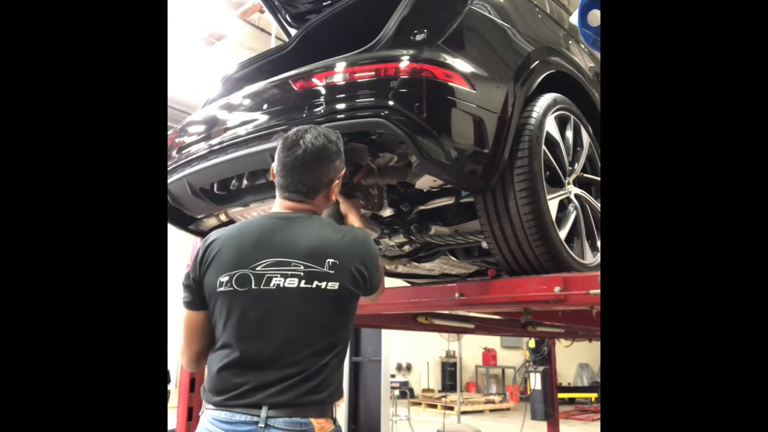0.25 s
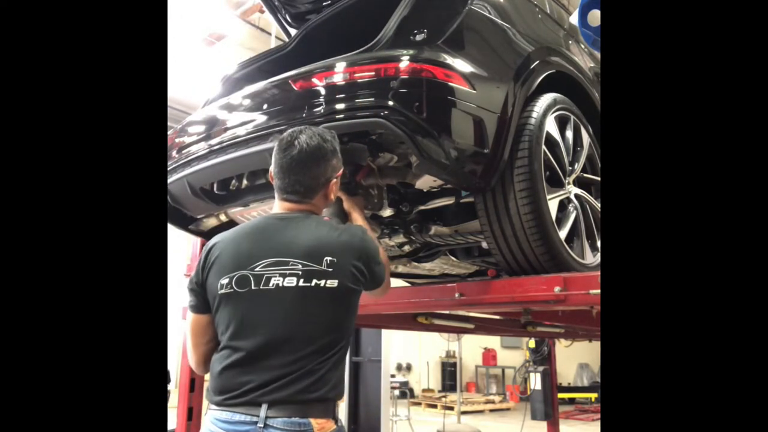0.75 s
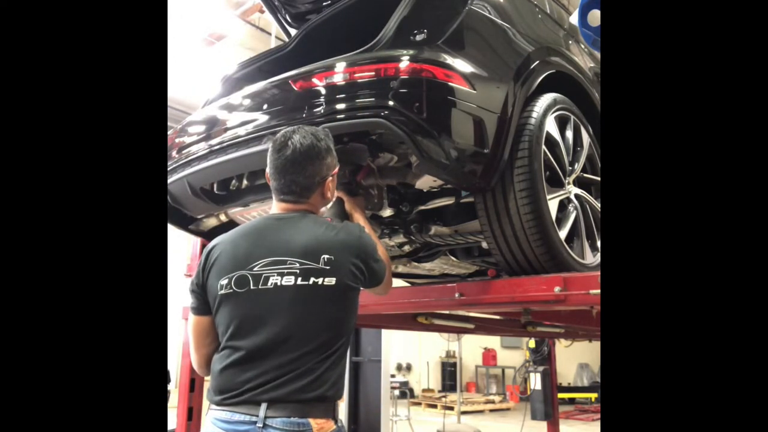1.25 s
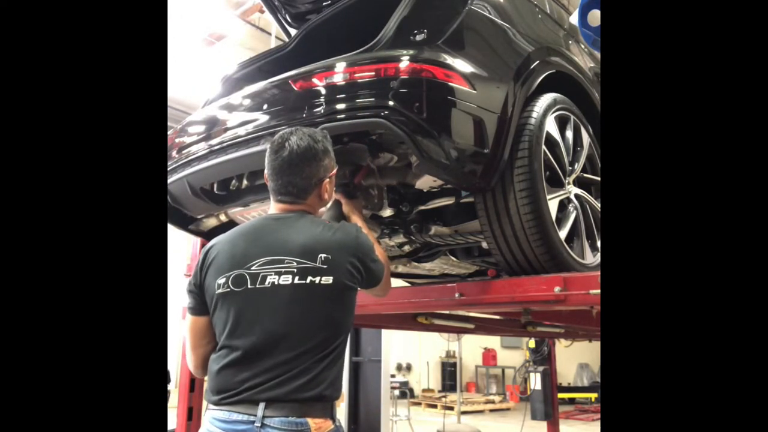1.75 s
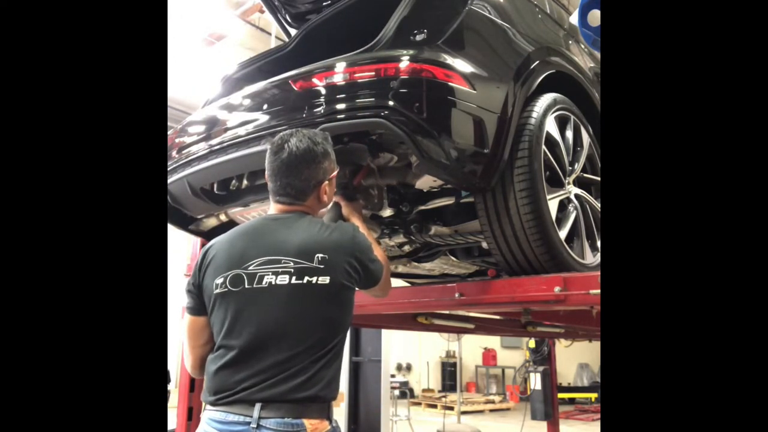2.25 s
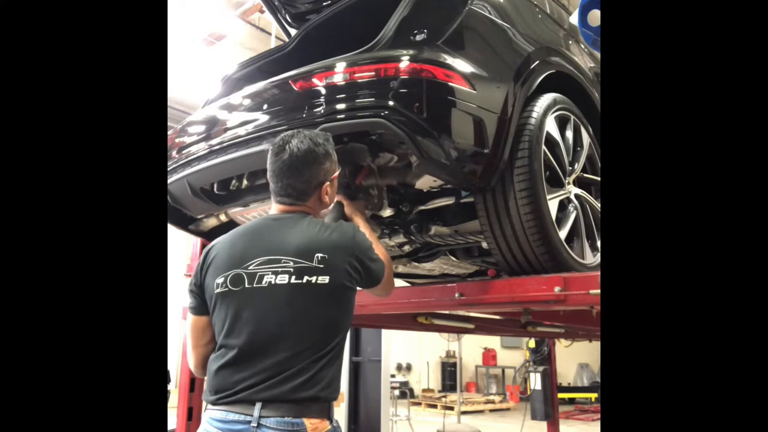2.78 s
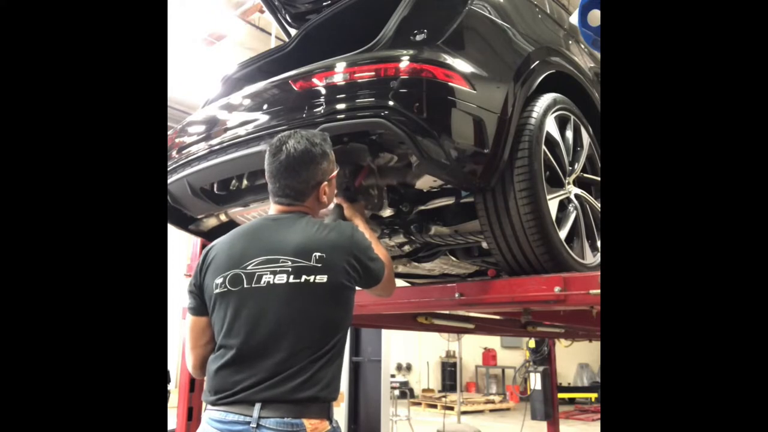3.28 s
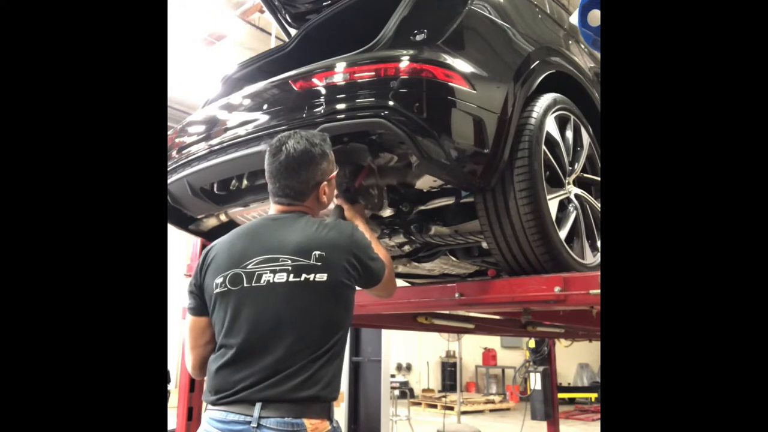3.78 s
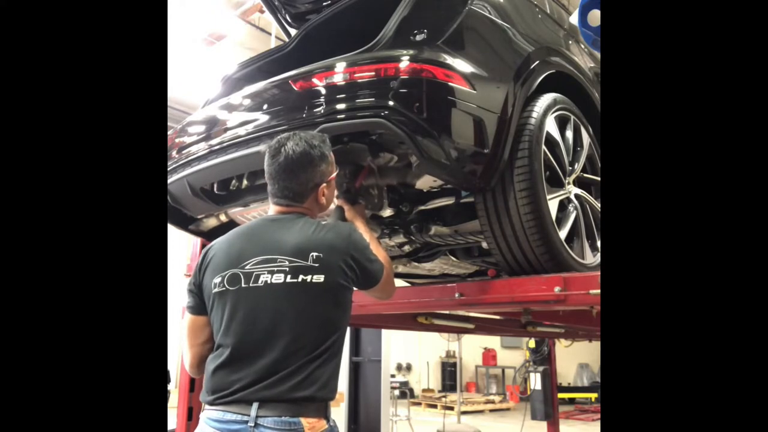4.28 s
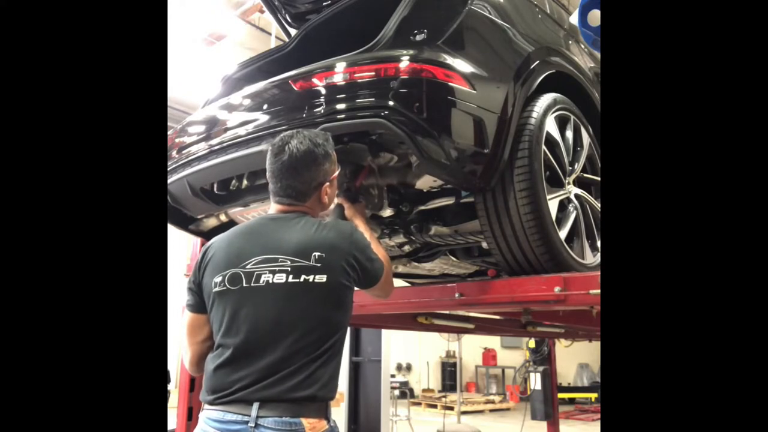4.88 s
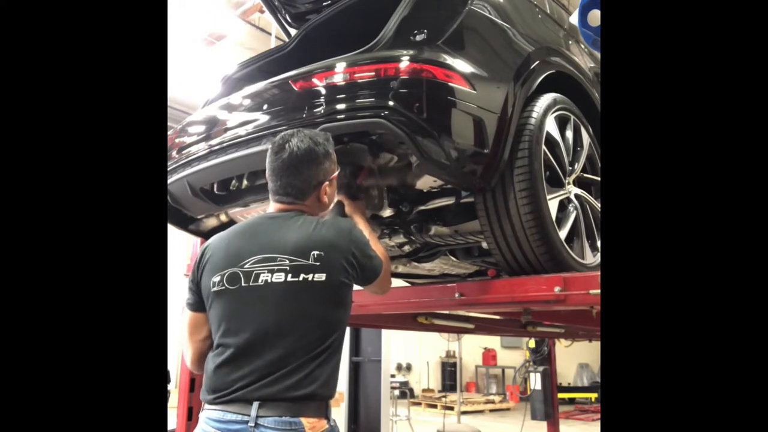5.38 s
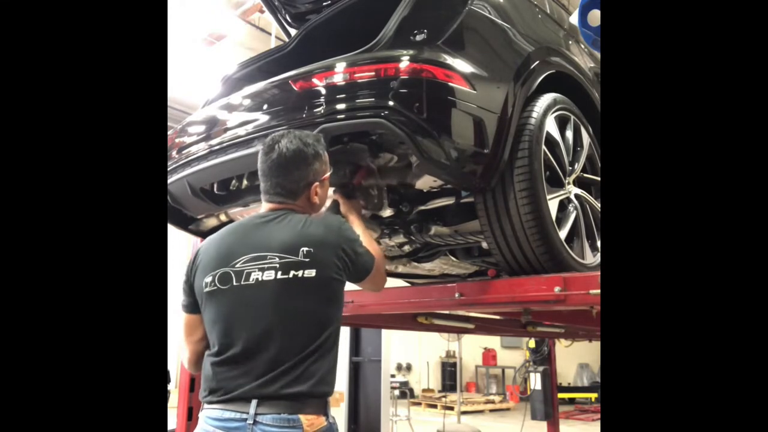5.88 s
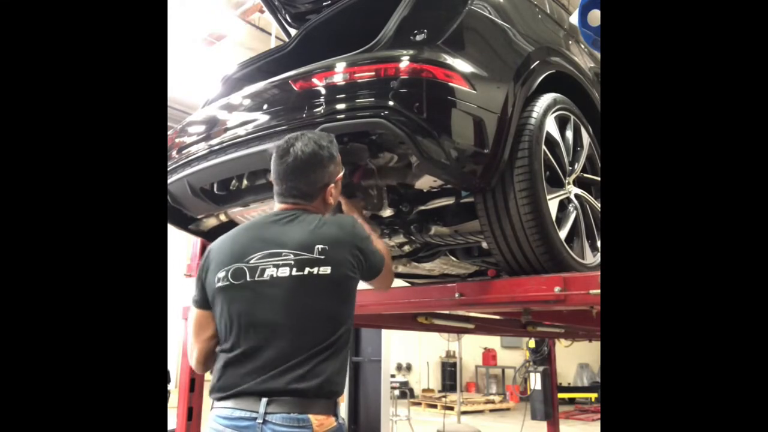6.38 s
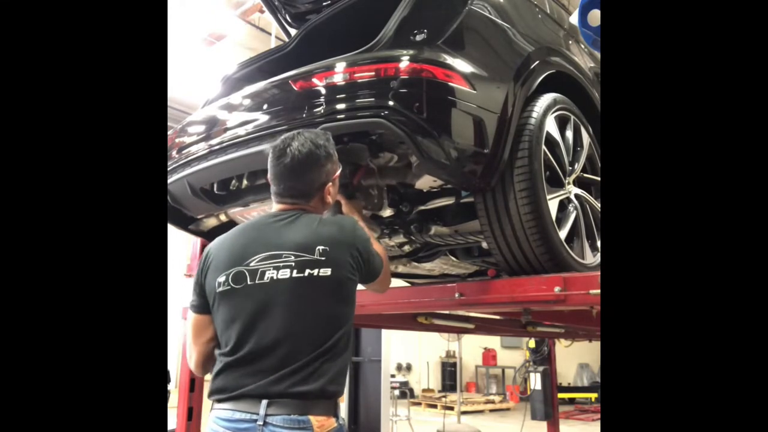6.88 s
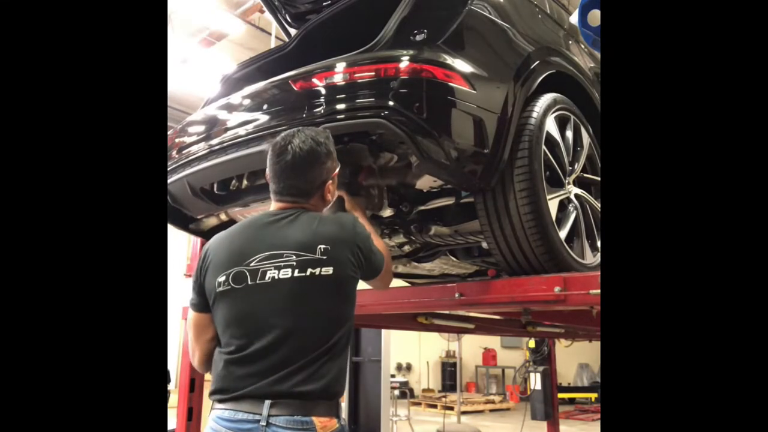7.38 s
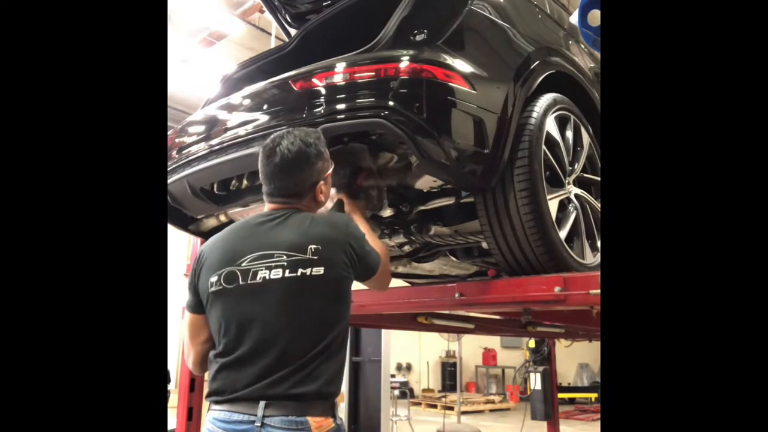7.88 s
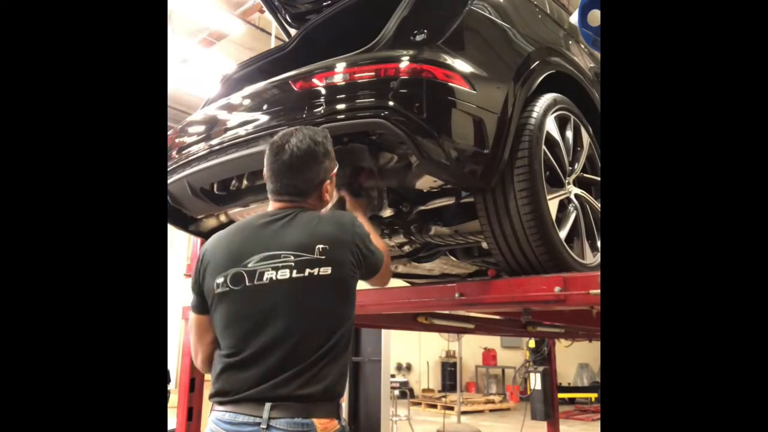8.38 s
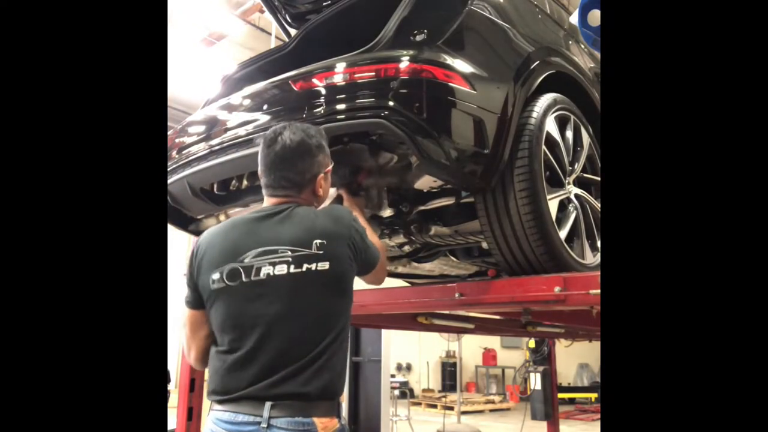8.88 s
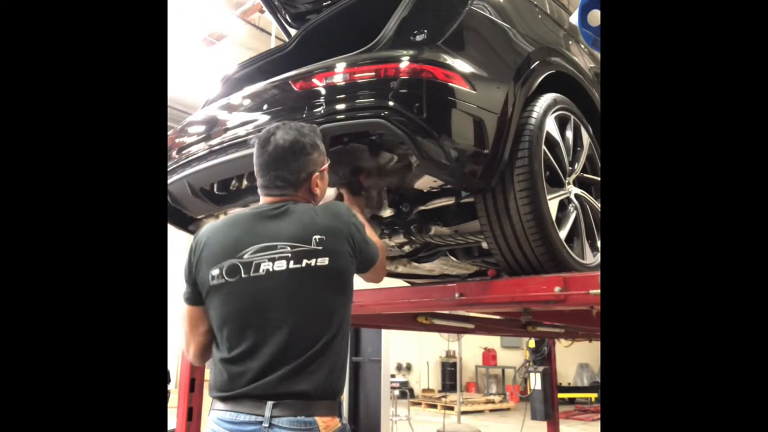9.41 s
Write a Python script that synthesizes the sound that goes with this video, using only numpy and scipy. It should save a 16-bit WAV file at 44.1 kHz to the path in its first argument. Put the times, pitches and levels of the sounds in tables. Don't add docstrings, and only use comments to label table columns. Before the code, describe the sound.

A quiet workshop hums briefly, then a motor whirs and clanks, and a reciprocating saw begins chattering on a steel exhaust pipe. The harsh, ringing buzz rises and falls, grows stronger midway, then binds and slaps in ragged jerks with dull thuds. It recovers into a steady, rougher rattle with booming shakes until the end. Heard from a few steps away with short room reverberation.

```python
import sys
import numpy as np
from scipy import signal
from scipy.fft import rfft, irfft, next_fast_len
from scipy.io import wavfile
from scipy.ndimage import uniform_filter1d, map_coordinates

SR = 44100
rng = np.random.default_rng(int(sys.argv[2]) if len(sys.argv) > 2 else 0)


def natural_amplitude(level_db):
    exponent = np.asarray(level_db, float) / 20
    return 10 ** exponent


def unload_audio(sound):
    columns = np.transpose(np.atleast_2d(sound))
    steps = np.round(np.clip(columns, -1, 1) * 32767)
    wavfile.write(sys.argv[1], SR, steps.astype(np.int16))


N = 425565

# frequency in Hz, rms level in dB.
MACHINE_TONES = [(91.5, -53.5), (161.5, -62), (269.2, -63.5), (355.3, -64.5), (479.1, -59), (1550, -70),
                 (1680, -68), (4560, -79), (4802, -86), (5281, -85)]
# frequency in Hz, density in dB per Hz.
AIR_SPECTRUM = [(15, -98), (25, -55), (92, -10.5), (120, -52), (145, -7), (206, -15), (270, -15),
                (363, -19), (416, -14), (476, -25), (516, -21), (1520, -24), (16000, -63)]
# frequency in Hz, t60 in seconds.
SHOP_T60 = [(200, 0.76), (1500, 0.59), (5000, 0.42), (14000, 0.33)]
# time in seconds, level in dB.
SPIN_UP = [
    (.366, -100),
    (.372, -56),
    (.46, -51),
    (.5, -45),
    (.52, -48),
    (.56, -100),
]
# frequency in Hz, width in Hz, level in dB.
MOTOR_MODES = [(969, 24, -4), (1220, 33, 0), (1590, 54, -6), (2170, 60, -14), (2410, 70, -15),
               (3620, 52, -17), (4230, 27, -14), (4730, 26, -6), (4960, 37, -8), (5200, 40, -12),
               (5600, 600, -22), (9000, 4000, -25)]
# frequency in Hz, level in dB, t60 in seconds, rise in seconds.
CLANK_MODES = [(461, 2, 0.045, 0.008), (585, -6, 0.05, .012), (880, -9, 0.046, 0.0027),
               (1324, 11, 0.017, 0.002), (2100, -9, .03, 0.0016), (7160, -10, .03, .001)]
# frequency in Hz, width in Hz, level in dB.
THUMP_MODES = [(240, 120, -6), (400, 160, 0), (560, 150, -3)]
# time in seconds, strokes per second.
CRANK_SPEED = [(.36, 7.5), (.55, 23.56), (.75, 31.51), (1.25, 41.86), (1.8, 44.92), (2.3, 45.6),
               (3.7, 45.45), (4.3, 44.9), (4.9, 45.5), (5.4, 45), (6, 38.61), (6.3, 36.86), (6.6, 39.05),
               (6.9, 44.46), (7.7, 45), (8.9, 44.6), (9.65, 44.92)]
# time in seconds, pressure as pipe ring in dB, drag on the hangers in dB.
HAND = [(.54, -23, -39), (.82, -18.5, -54), (1.15, -19.5, -52), (1.27, -13, -52), (1.47, -13.5, -48),
        (1.6, -18.5, -48), (2.42, -23, -51), (2.52, -18, -51), (2.95, -25.5, -50), (4.1, -21.5, -43),
        (4.35, -12.5, -44), (4.8, -13.5, -43), (5.15, -13, -37), (5.3, -12.5, -35), (5.66, -13, -31),
        (5.76, -19.5, -40), (6.62, -23.5, -54), (6.95, -21.5, -52), (7, -14.5, -39), (7.4, -15.5, -33),
        (8, -15, -34), (8.5, -16.5, -34), (9.65, -15.5, -30)]
# time in seconds, depth (0 scratched, 1 through the wall, 2 open).
CUT_DEPTH = [
    (2, 0),
    (3.8, .36),
    (4.3, 1),
    (6.7, 1),
    (7.15, 2),
    (9.65, 2),
]
CHATTER_DB = [1.8, 1.5, 4.4]
LEAD_RAD = [1.5, 3, 2]
KNOCK_DB = [-27, -21, -19]
HISS_DB = [-7, -5.5, -2.3]
HISS_PER_RING_DB = [-.2, -.05, -.1]
RASP_DB = [-12, -9.5, -5]
# frequency in Hz, density in dB per Hz.
RASP_SPECTRUM = [(410, -48), (700, 4), (830, 5), (970, -1), (1290, -12), (1510, -12), (1650, -10),
                 (1740, 0), (2550, -3), (3100, -5.5), (3670, -13.5), (5080, -5.5), (7600, -11.5),
                 (8790, -11.5), (15800, -14.5)]
WALL_HZ = [1130, 1228, 1340, 1385, 1440, 1587, 1710, 1760, 1830, 1960, 2075, 2130, 2273, 2426, 2625, 2707,
           2795, 2976, 3090, 3310, 3440, 3926, 4208, 4383, 4565, 4936, 5087, 5307, 5851, 6032, 6187, 6459,
           6858, 8177, 8683, 8880, 9533, 10300, 10761, 11400, 12031, 12500, 12968, 13404, 13991, 14500,
           14976, 15433]
# width in Hz, level in dB barely cut, in dB through the wall, in dB cut open.
WALL_WIDTH_DB = [(45, -13, -5, -2), (40, -9, -10, -1), (35, -12, -6, 1), (35, -1, -3, -2),
                 (45, -10, -1, -1), (22, 0, 6, 8), (35, 2, -2, -2), (35, -4, 1, 2), (35, 1, 2, 5),
                 (40, -2, -3, -4), (45, 2, -3, -2), (45, 0, -1, -3), (45, 4, 0, -1), (30, 0, -1, 2),
                 (45, -4, -6, -6), (45, -3, -5, -3), (50, -4, -3, -4), (35, -5, -5, -4), (50, 3, -6, -3),
                 (60, -11, -12, -7), (50, -14, -14, -10), (45, -9, -9, -7), (50, -11, -9, -10),
                 (40, -14, -12, -13), (70, -11, -8, -7), (60, -8, -8, -8), (60, -8, -4, -5),
                 (50, -11, -5, -3), (90, -13, -8, -6), (50, -5, -5, -6), (90, -8, -7, -9),
                 (60, -11, -13, -7), (140, -15, -13, -9), (100, -22, -17, -12), (70, -14, -11, -10),
                 (190, -11, -8, -9), (110, -15, -12, -16), (200, -24, -18, -14), (140, -16, -14, -14),
                 (200, -24, -22, -18), (90, -21, -19, -14), (150, -19, -22, -20), (110, -15, -17, -17),
                 (140, -19, -12, -21), (140, -19, -18, -15), (200, -24, -22, -15), (120, -18, -16, -11),
                 (95, -16, -15, -17)]
# time in seconds, half length in seconds, frequency in Hz, level in dB.
SINGING = [(.56, .03, 2000, 4), (1.79, .03, 3090, 7), (4.55, .1, 1587, 3), (4.75, .1, 1790, 3),
           (5.05, .1, 1825, 3), (5.52, .03, 1825, 5), (5.63, .03, 1587, 5), (5.15, .12, 1587, 3),
           (5.33, .04, 1780, 4), (5.9, .2, 3050, 4), (6.55, .1, 1830, 4), (7.65, .1, 1500, 4),
           (8.17, .08, 1780, 5), (8.79, .03, 2426, 6), (9.42, .05, 4650, 5), (7.32, .04, 1600, 4),
           (7.47, .04, 1700, 4), (8.57, .03, 1900, 4), (9.11, .04, 1400, 4)]
# time in seconds, slap in dB.
SKIPS = [(.543, -10), (.6117, -12), (.7095, -13), (.7718, -10), (.8043, -8), (.8292, -3.5), (.8654, -6),
         (.92, -4.5), (1.0317, -11), (1.186, -2), (1.214, -4), (1.3074, 1), (1.372, 0), (1.419, -.5),
         (1.744, -2), (1.7735, .5), (1.8, -3), (1.8324, -9), (1.8773, -8), (1.9935, -9), (2.2764, -7),
         (2.3216, -9), (2.3367, -8), (2.4928, -7), (2.5423, -6), (2.5803, -6), (2.886, -7), (3.3929, -11),
         (3.4822, -8), (4.0976, -9), (4.3773, 1), (4.8231, 1), (5.0909, .5)]
# time in seconds, slap in dB, stall before it
# in dB, hanger thud in dB.
BINDS = [(5.3838, -1, 8, -33), (5.4474, -1.5, 6, -31), (5.5597, -5.5, 5, -28), (5.622, 3, 5, -29),
         (5.7975, -5, 3, -45), (5.819, -1, 2, -46), (5.8647, -2, 2, -50), (6.014, -12, 3, -50),
         (6.0405, -9, 6, -40), (6.0475, -6, 1, -40), (6.073, -9, 4, -52), (6.082, -5, 1, -52),
         (6.15, -40, 26, -50), (6.181, -26, 28, -50), (6.1935, -7, 8, -44), (6.2306, -7, 6, -29),
         (6.2683, 2, 4, -25), (6.324, 2, 4, -33), (6.3872, -1, 3, -36), (6.41, -3, 2, -44),
         (6.463, -2, 2, -44), (6.522, -14, 3, -50), (6.558, -9, 9, -48), (6.608, -18, 6, -50),
         (6.631, -16, 4, -50), (6.6645, -4, 11, -39), (6.7105, -16, 12, -45), (6.7305, -3, 8, -33),
         (6.7775, -10, 6, -31), (6.799, 0, 6, -30), (6.8986, -9, 3, -48), (6.919, -9, 5, -48),
         (6.9657, -8, 5, -46), (6.9855, -4, 4, -36), (7.2112, -1, 4, -30), (7.257, -12, 14, -36),
         (7.281, -5, 4, -38), (7.2987, -4, 2, -38), (7.367, -4, 2, -36),
         (7.4343, -3, 9, -32), (7.4578, -4, 1, -36), (7.5925, -7, 4, -34), (7.635, -5, 8, -24),
           (7.658, -4, 3, -34), (7.7225, -6, 8, -27), (7.7611, -4, 3, -34), (7.8065, -11, 7, -29),
           (7.872, -9, 3, -25), (7.9719, -6, 5, -23), (8.0615, -8, 7, -25), (8.105, -3, 2, -26),
           (8.19, -4, 2, -36), (8.2603, -7, 5, -38), (8.3472, -7, 8, -34), (8.4126, -6, 8, -30),
           (8.4794, -9, 11, -28), (8.554, -1, 16, -28), (8.6164, -6, 3, -32), (8.681, 0, 14, -27),
           (8.7065, -7, 3, -34), (8.741, -6, 7, -30), (8.7736, -4, 3, -21), (8.7962, -4, 2, -34),
           (8.858, -10, 9, -27), (8.886, -5, 2, -34), (8.9226, -7, 7, -34), (8.9512, -6, 3, -31),
           (8.9912, -9, 4, -25), (9.0133, -7, 3, -34), (9.0637, -8, 4, -22), (9.0946, -4, 2, -34),
           (9.152, -8, 5, -30), (9.182, -5, 2, -34), (9.2174, -8, 4, -27), (9.3308, -5, 7, -25),
           (9.3553, -6, 2, -25), (9.4, -7, 4, -29), (9.4677, -6, 3, -34), (9.5549, -7, 4, -30),
           (9.616, -10, 6, -34)]
# frequency in Hz, width in Hz, level in dB.
SHOE_MODES = [(1110, 170, -1), (1230, 260, 0)]
# time in seconds, level in dB.
HARD_KNOCKS = [(7.0778, -12), (7.1002, -14), (7.1232, -11), (7.1451, -9), (7.213, -6), (7.3013, -16),
               (7.3227, -15), (7.3671, -7), (7.4374, -9), (7.5462, -14), (7.5911, -14), (7.637, -9),
               (7.6699, -13), (7.7862, -18), (7.8585, -8), (7.9019, -12), (7.9263, -11), (7.9473, -9),
               (7.9922, -13), (8.083, -11), (8.1723, -13), (8.283, -14), (8.303, -12), (8.3474, -15),
               (8.3713, -14), (8.4147, -11), (8.4821, -10), (8.5544, -16), (8.6846, -8), (8.7066, -11),
               (8.7739, -12), (8.7964, -10), (8.8637, -14), (8.8852, -11), (8.9316, -13), (8.953, -11),
               (9.0857, -11), (9.1087, -8), (9.176, -12), (9.2219, -16), (9.2433, -14), (9.3331, -11),
               (9.3561, -9), (9.397, -17), (9.4489, -11), (9.4673, -9), (9.5566, -11), (9.6235, -12)]
# frequency in Hz, width in Hz, level in dB.
HANGER_MODES = [(186, 40, 3), (300, 66, 0), (520, 94, 6.5), (670, 116, 7), (860, 160, 3)]
# time in seconds, level in dB.
BOOM = [(5.1, -25), (5.3, 8), (5.8, 8), (6.3, 8), (6.9, -3), (7.4, 4)]
# multiple of the crank speed, level in dB.
CRANK_ORDERS = [(3.5, 2), (4, 0), (5, 2), (6, -6), (7, -8), (8, -1), (9, 0), (10, 0), (13, -1)]


def unit(x):
    return x / np.sqrt(np.mean(x ** 2) + 1e-20)


def along(points, hz):
    f, v = np.transpose(points)
    return np.interp(np.log(hz + 1), np.log(f + 1), v)


def curves(rows):
    s, *cols = np.transpose(rows)
    return [np.interp(np.arange(N) / SR, s, c) for c in cols]


def wobble(rate_hz):
    at = np.arange(0, N + 16, 16)
    knots = rng.standard_normal(int(N * rate_hz / SR) + 4)
    return np.interp(np.arange(N), at, map_coordinates(knots, [at * rate_hz / SR]))


def filtered(x, response):
    m = next_fast_len(N + SR // 2)
    return irfft(rfft(x, m) * response(np.fft.rfftfreq(m, 1 / SR)), m)[..., :N]


def modes(table):
    def response(f):
        total = 0
        for k, (hz, width, db) in enumerate(table):
            total = total + (-1) ** k * natural_amplitude(db) * 1j * f * width / (hz * hz - f * f + 1j * f * width)
        return total
    return response


def machines():
    t = np.arange(N) / SR
    hum = 0
    for hz, db in MACHINE_TONES:
        level = np.sqrt(2) * natural_amplitude(db + 2.4 * wobble(3))
        hum = hum + level * np.sin(2 * np.pi * hz * t + 0.23 * wobble(4.7))
    air = unit(filtered(rng.standard_normal(N), lambda f: natural_amplitude(along(AIR_SPECTRUM, f))))
    return hum + natural_amplitude(-51.5) * air


def slaps(at_s, db, t60_s, crack):
    blows = np.bincount(np.round(at_s * SR).astype(int), natural_amplitude(db), N)
    t = np.arange(SR // 5) / SR
    rise_s = .002
    shape = natural_amplitude(-60 * t / np.c_[t60_s]) * (1 - np.exp(-t / rise_s)) + crack * natural_amplitude(-60 * t / 0.011)
    return signal.fftconvolve(blows[None], shape, axes=1)[:, :N] * rng.standard_normal(N)


def start():
    out = natural_amplitude(curves(SPIN_UP)[0]) * unit(filtered(rng.standard_normal(N), modes(MOTOR_MODES)))
    t = np.arange(SR // 4) / SR
    ring = 0
    for hz, db, t60_s, rise_s in CLANK_MODES:
        ring = ring + natural_amplitude(db - 60 * t / t60_s) * (1 - np.exp(-t / rise_s)) * np.sin(2 * np.pi * hz * t)
    grit = np.diff(uniform_filter1d(rng.standard_normal(len(t) + 3), size=6), 1)[:-2]
    crack = 1.3 * natural_amplitude(-60 * t / .1) * grit
    clank_s, clank_db = .5122, -9
    out[round(clank_s * SR):][:len(t)] += natural_amplitude(clank_db) * (ring + crack)
    thump = slaps(np.array([.524]), np.array([-6]), t60_s=[.2], crack=0)[0]
    return out + filtered(thump, modes(THUMP_MODES))


def crank_angle():
    return 2 * np.pi * np.cumsum(curves(CRANK_SPEED)[0]) / SR


def by_depth(values):
    return np.interp(curves(CUT_DEPTH)[0], np.arange(3), values)


def jolts():
    skip_stall_db, thud_over_slap_db = 3.5, -42
    skips = [(s, db, skip_stall_db, db + thud_over_slap_db) for s, db in SKIPS]
    return np.transpose(skips + BINDS)


def lifted():
    at_s, _, stall_db, _ = jolts()[..., None]
    stall_s, stall_s_per_db, regrip_s = .008, .0017, .0075
    before_s = np.arange(1, SR // 6) / SR
    fall = np.exp(-(before_s / (stall_s + stall_s_per_db * stall_db)) ** 3)
    gain = np.ones(N)
    np.minimum.at(gain, np.round((at_s - before_s) * SR).astype(int), natural_amplitude(-stall_db * fall))
    return uniform_filter1d(gain, round(regrip_s * SR))


def teeth(angle):
    depth_db = by_depth(CHATTER_DB) * np.clip(1 + wobble(9) / 2, 0, 2)
    phase = angle + by_depth(LEAD_RAD)
    swell = np.cos(phase) + 0.85 * np.cos(2 * phase + 0.67)
    uneven_db = .5 * wobble(14) + 0.91 * wobble(45) + 1.33 * wobble(300)
    force = natural_amplitude([[.3], [.6]] * (depth_db * swell) + uneven_db) * rng.standard_normal(N)
    return force / np.sqrt(np.abs(uniform_filter1d(force ** 2, SR // 6)))


def patchy(x, patchy_db):
    hz, t, z = signal.stft(x, SR, nperseg=512)
    field = uniform_filter1d(rng.standard_normal(z.shape[1:]), size=4, axis=0)
    field = uniform_filter1d(field, size=9, axis=1)
    sing_db = 0
    for s, half_s, mode_hz, db in SINGING:
        width_hz = 90 * mode_hz / 2000
        off = ((hz[:, None] - mode_hz) / width_hz) ** 2
        sing_db = sing_db + db * np.exp(-((t - s) / half_s) ** 4 - off)
    return signal.istft(z * natural_amplitude(patchy_db * unit(field) + sing_db), nperseg=512)[1][:, :N]


def body(table, between, between_db):
    f = np.fft.rfftfreq(8192, 1 / SR)
    power = sum(np.abs(modes([row])(f)) ** 2 for row in table)
    power = power + natural_amplitude(2 * (between_db + along(between, f)))
    power = power / power[(f > 1000) & (f < 3400)].mean() * SR / 4800
    power = power * (natural_amplitude(-44.5) + 1 / (1 + (1030 / (f + 1)) ** 10) ** 2) / (1 + (600 / (f + 1)) ** 8)
    cepstrum = irfft(np.log(power + 1e-12) / 2)
    cepstrum = cepstrum * np.r_[1, np.full(4095, 2), 1, np.zeros(4095)]
    return irfft(np.exp(rfft(cepstrum)))


def pipe(force, tilt_db):
    depth, wall = np.clip(curves(CUT_DEPTH)[0], 0, 2), 0
    for stage, bed_db in enumerate(RASP_DB):
        table = [(hz, width, db[stage]) for hz, (width, *db) in zip(WALL_HZ, WALL_WIDTH_DB)]
        share = np.sqrt(np.clip(1 - np.abs(depth - stage), 0, 1))
        answer = body(table, RASP_SPECTRUM, bed_db)[None]
        wall = wall + share * signal.oaconvolve(force, answer, axes=1)[:, :N]

    def top(f):
        return 1 / (1 + (3700 / (f + 1)) ** 8)
    return filtered(wall[0], lambda f: 1 - top(f)) + natural_amplitude(tilt_db) * filtered(wall[1], top)


def shoe(angle, db):
    at = np.flatnonzero(np.diff(np.floor(angle / (2 * np.pi) + 0.03)))
    blows = np.zeros(N)
    blows[at] = natural_amplitude(db[at] + 3.9 * rng.standard_normal(len(at)) + 2.3 * wobble(12)[at])
    open_s, hard_lead_s, hard_gain_db = 7.05, .002, 1.5
    after = np.round((jolts()[0] + 0.00198) * SR).astype(int)
    blows[after] = natural_amplitude(db[after] + 5) * (after < open_s * SR)
    hard_s, hard_db = np.transpose(HARD_KNOCKS)
    blows[np.round((hard_s - hard_lead_s) * SR).astype(int)] = natural_amplitude(hard_db + hard_gain_db)
    push = np.hanning(110) * np.sin(2 * np.pi * 1250 * np.arange(110) / SR)
    push = signal.fftconvolve(push, irfft(modes(SHOE_MODES)(np.fft.rfftfreq(4096, 1 / SR))))
    return signal.fftconvolve(blows, push / np.abs(push).max())[:N]


def hangers(shake):
    def low(table):
        return filtered(shake, lambda f: modes(table)(f) / (1 + (110 / (f + 1)) ** 2))
    return natural_amplitude(curves(BOOM)[0]) * low(HANGER_MODES[:1]) + low(HANGER_MODES[1:])


def crank_tone(angle, sag_hz):
    tone = sum(natural_amplitude(db + 1.7 * wobble(3.88)) * np.sin(k * angle) for k, db in CRANK_ORDERS)
    return natural_amplitude(-60 - 1.5 * sag_hz) * tone


def saw():
    angle, (ring_db, shake_db) = crank_angle(), curves(HAND)
    free_hz = 45.6
    sag_hz = free_hz - curves(CRANK_SPEED)[0]
    running = np.clip((np.arange(N) / SR - .538) / 0.0033, 0, 1)
    force, contact = teeth(angle), lifted()
    at_s, slap_db, _, thud_db = jolts()

    hiss_db = by_depth(HISS_DB) + by_depth(HISS_PER_RING_DB) * (ring_db - ring_db.mean())
    grip = contact ** [[1], [1.3]]
    bite = natural_amplitude(ring_db - 1) * running * force * grip * natural_amplitude([[0], [-.12]] * sag_hz)
    slap = contact * slaps(at_s, slap_db - 13.5, t60_s=[.16, .14], crack=0.35)
    metal = pipe(patchy(bite, patchy_db=2) + slap, hiss_db + 5.3)

    thud_lead_s = .012
    shake = natural_amplitude(shake_db + 9.5 + 2.5 * wobble(11)) * running * force[0]
    shake = shake + slaps(at_s - thud_lead_s, thud_db + 14, t60_s=[.09], crack=0.6)[0]
    knocks = running * np.sqrt(contact) * shoe(angle, ring_db + by_depth(KNOCK_DB) + 14)
    return metal + knocks + hangers(shake) + crank_tone(angle, sag_hz)


def shop(x):
    hz, t, z = signal.stft(rng.standard_normal(SR), SR, nperseg=256)
    decay = natural_amplitude(-60 * t / along(SHOP_T60, hz)[:, None])
    tail = signal.istft(z * decay, SR, nperseg=256)[1]
    return signal.fftconvolve(np.pad(x, (500, 0)), tail / np.linalg.norm(tail))[:N]


def scene():
    near = start() + saw()
    dull_hz = 8000
    dulled = filtered(near, lambda f: 1 / (1 + 1j * f / dull_hz))
    return (near + natural_amplitude(-8) * shop(dulled) + machines())[None]


def roll_off(x):
    return signal.sosfilt(signal.butter(12, 16520, fs=SR, output="sos"), x)


def record(dry):
    top_hz = 15780
    rounded = dry / (1 + np.abs(dry / .82) ** 6) ** (1 / 6)
    mix = filtered(rounded, lambda f: (f < top_hz) / (1 + (20 / (f + 1)) ** 2))
    return roll_off(mix)


dry = scene()
out = record(dry)
unload_audio(out)
```